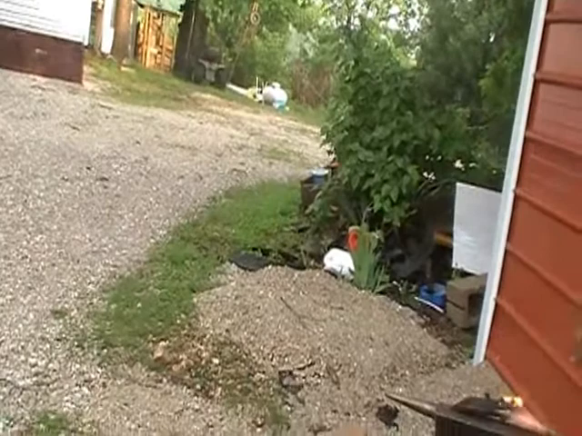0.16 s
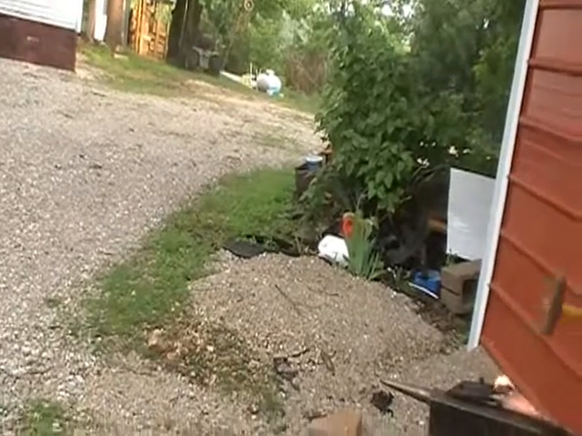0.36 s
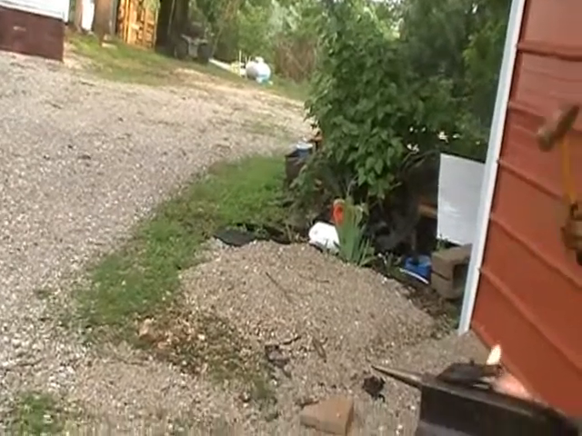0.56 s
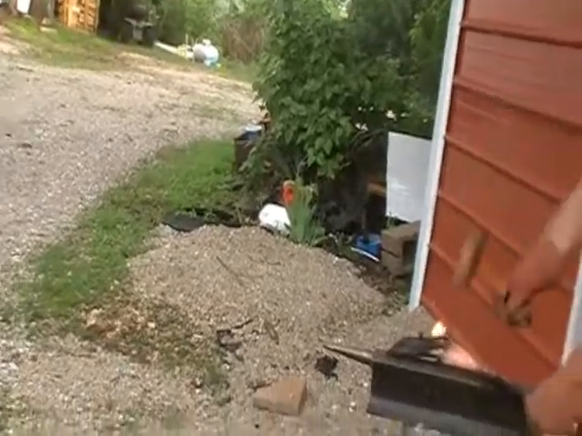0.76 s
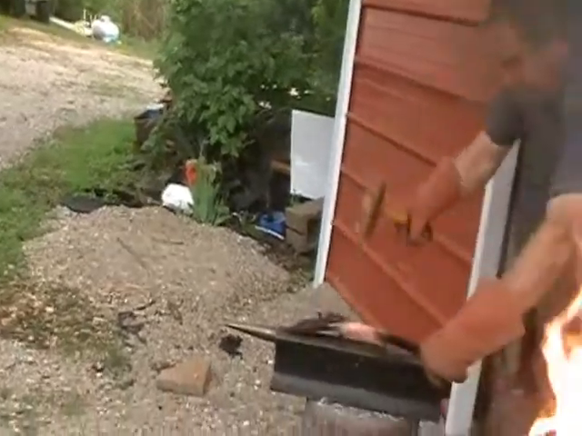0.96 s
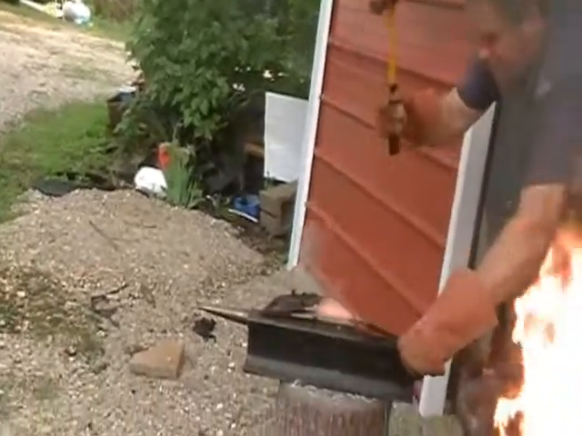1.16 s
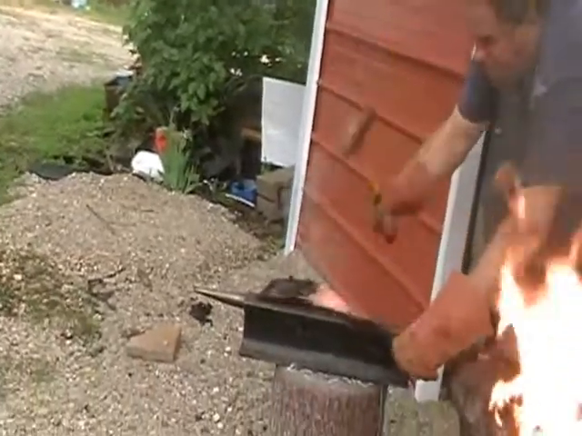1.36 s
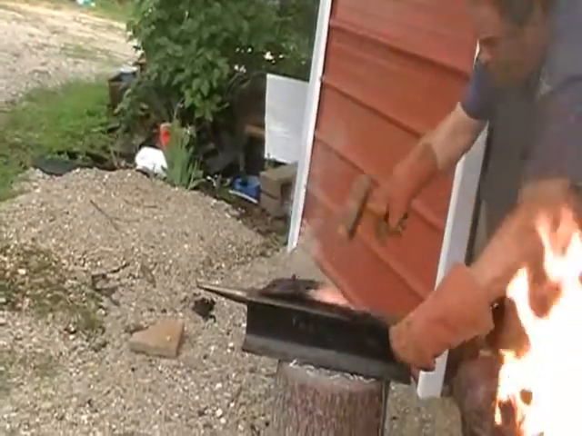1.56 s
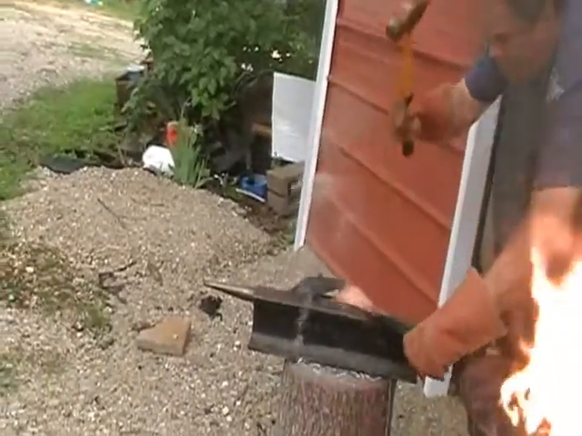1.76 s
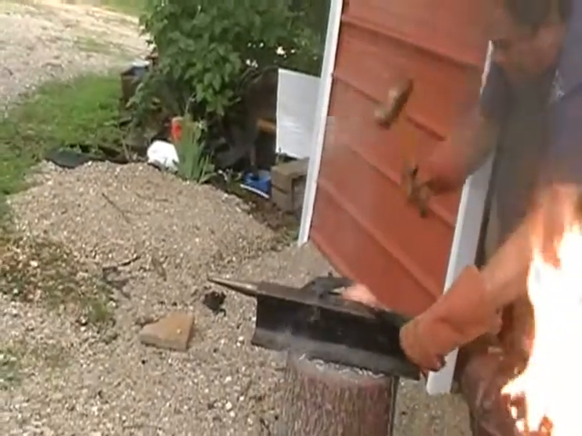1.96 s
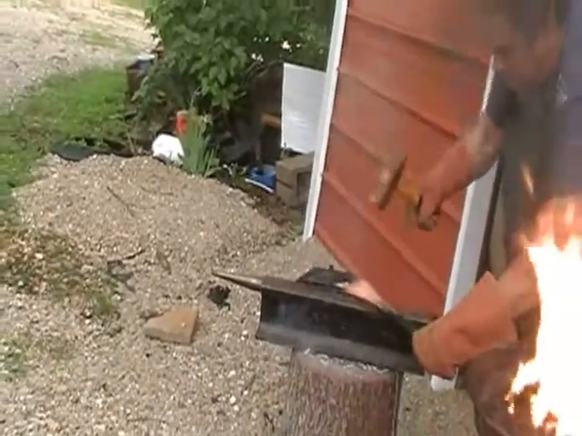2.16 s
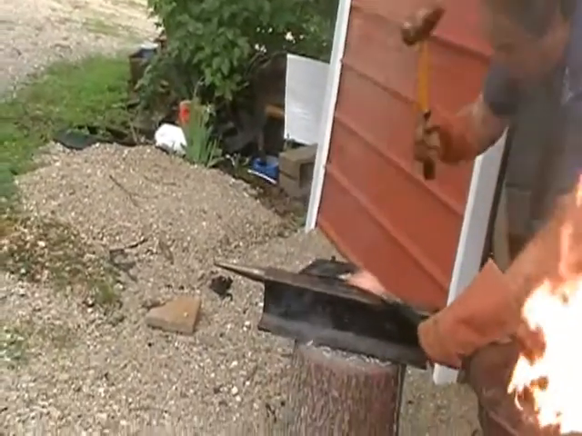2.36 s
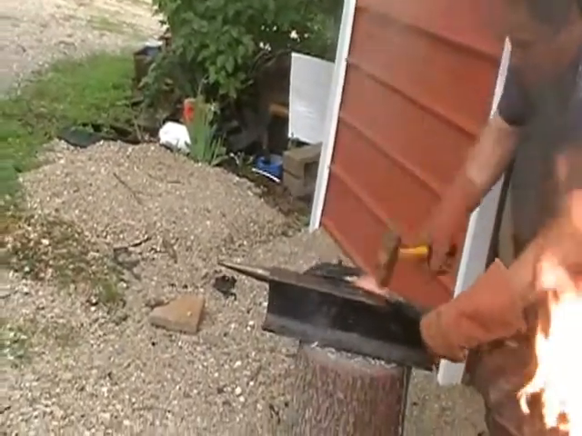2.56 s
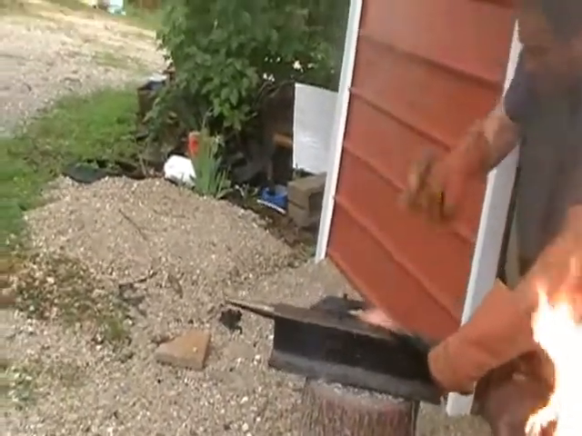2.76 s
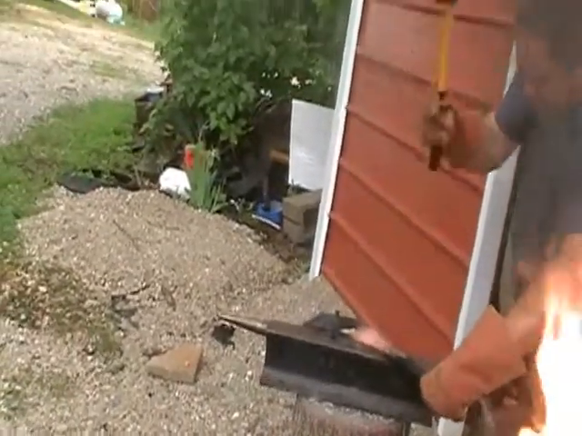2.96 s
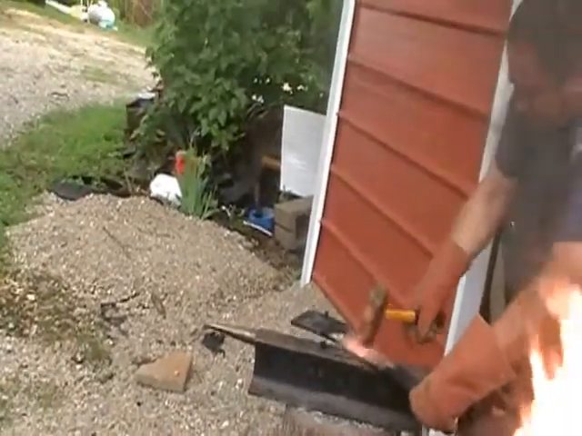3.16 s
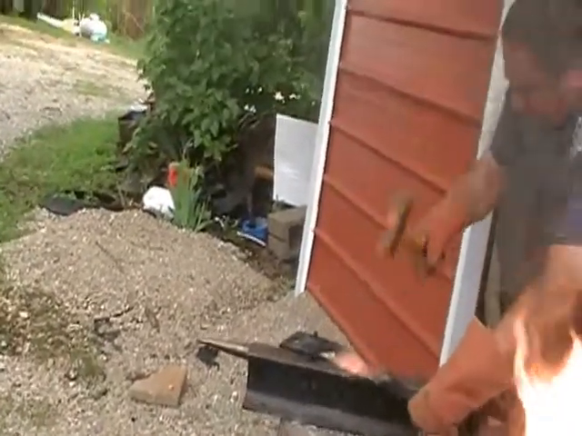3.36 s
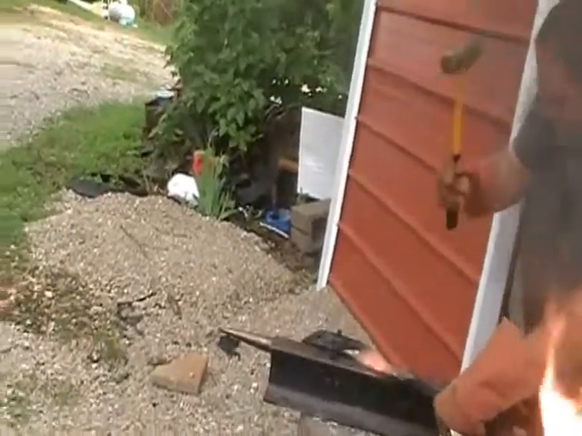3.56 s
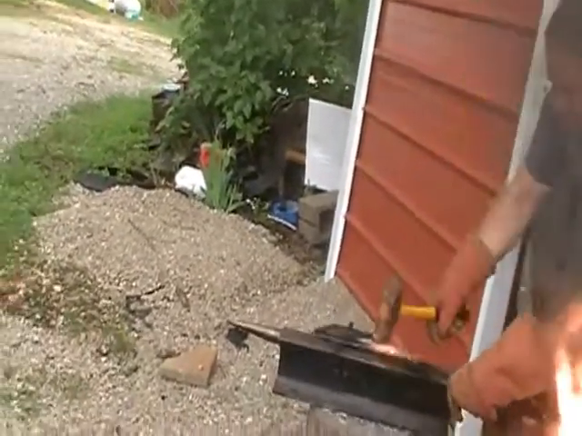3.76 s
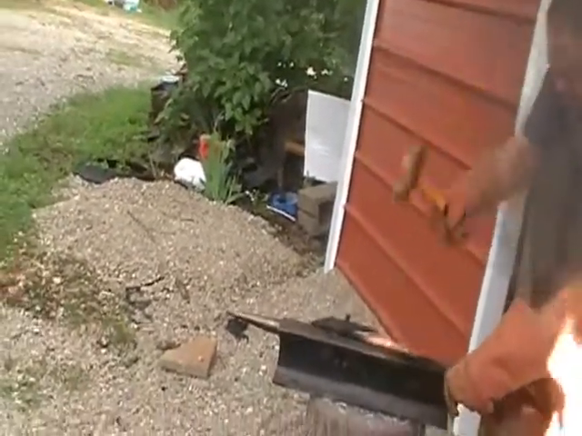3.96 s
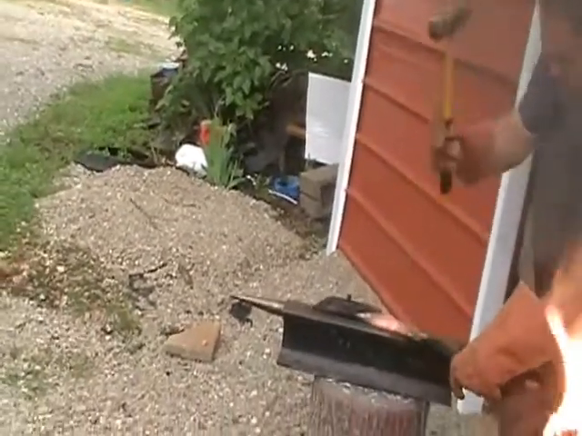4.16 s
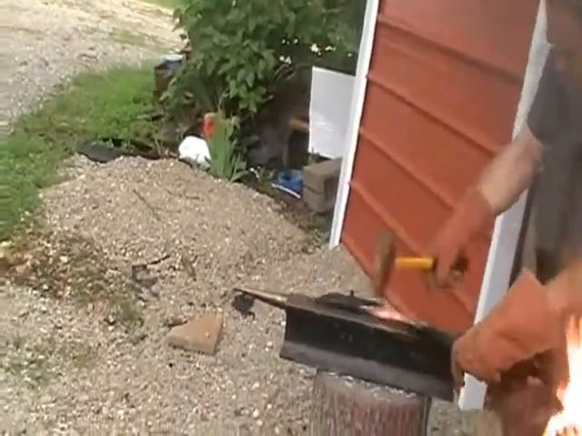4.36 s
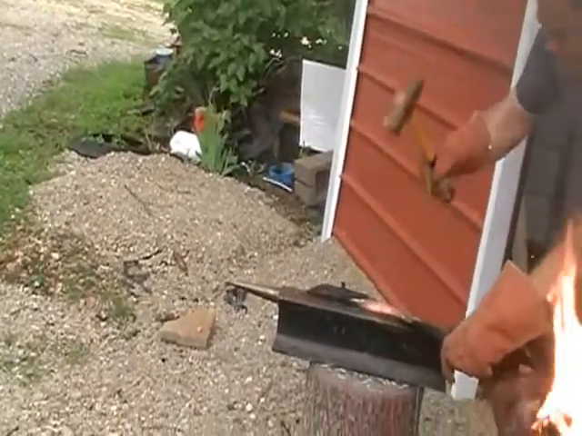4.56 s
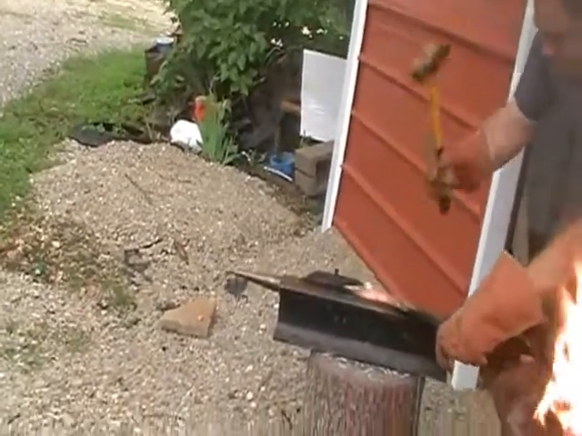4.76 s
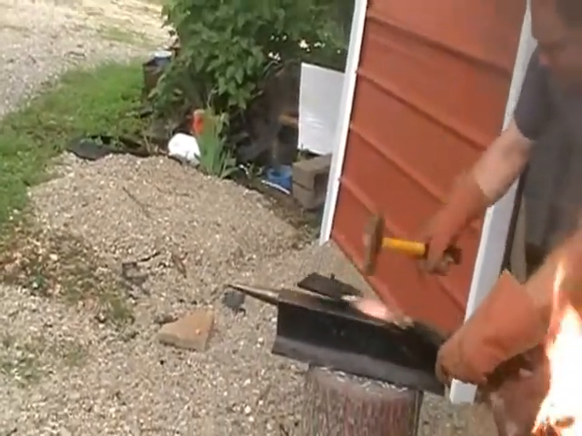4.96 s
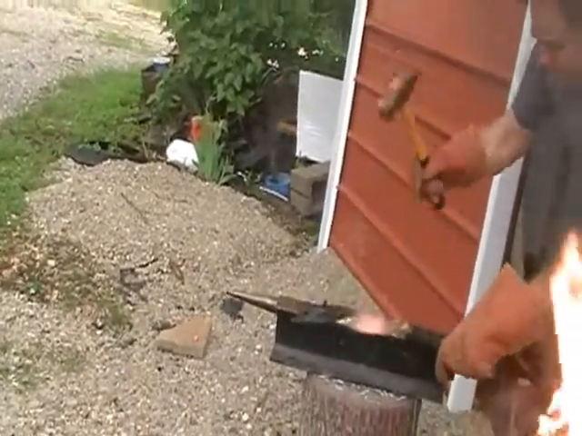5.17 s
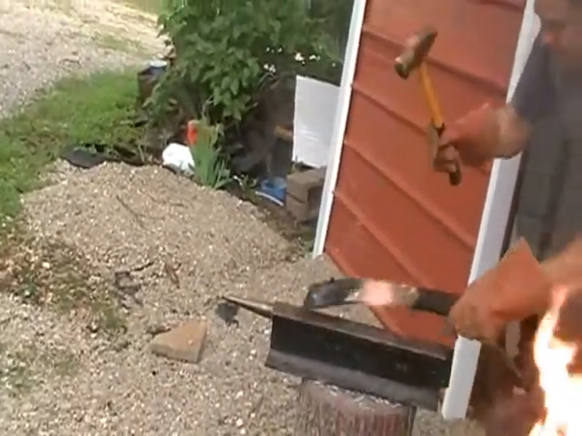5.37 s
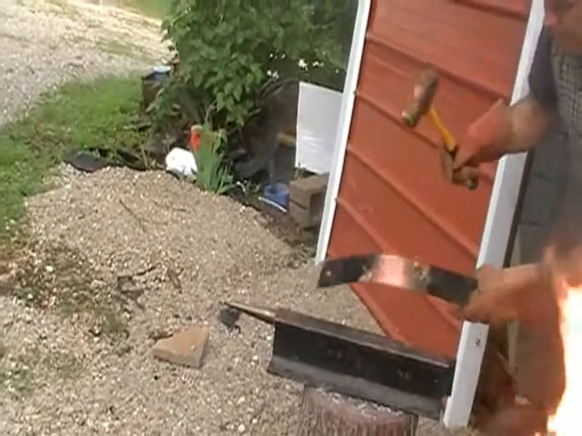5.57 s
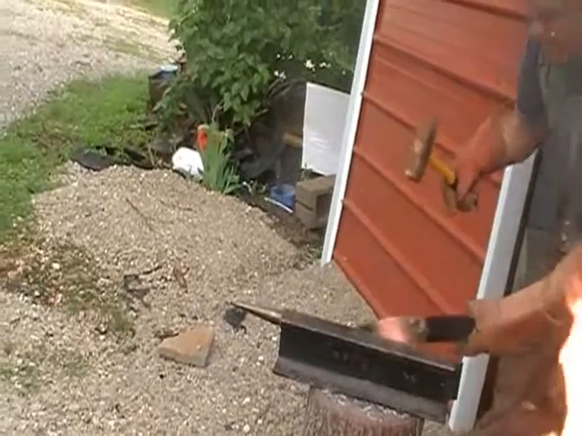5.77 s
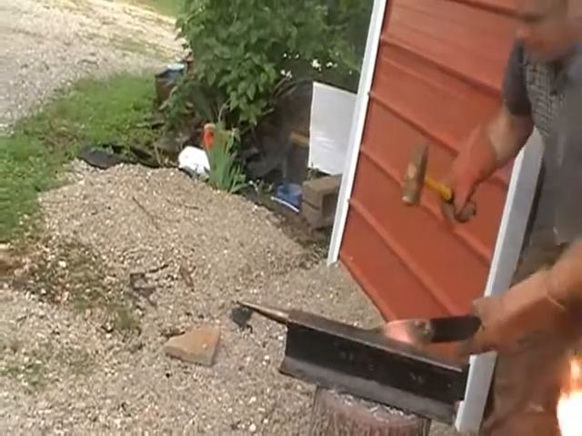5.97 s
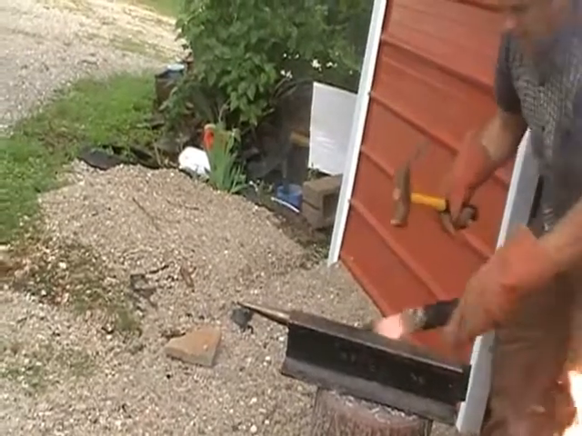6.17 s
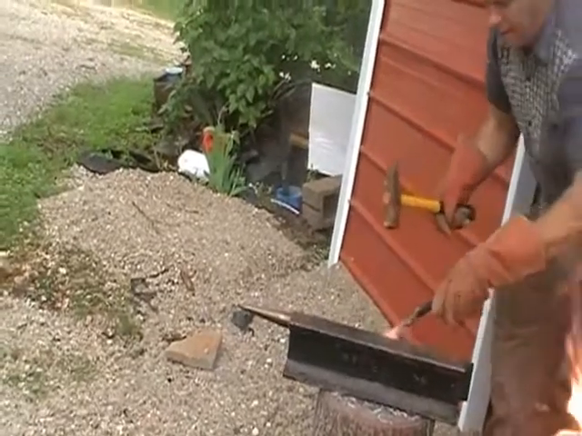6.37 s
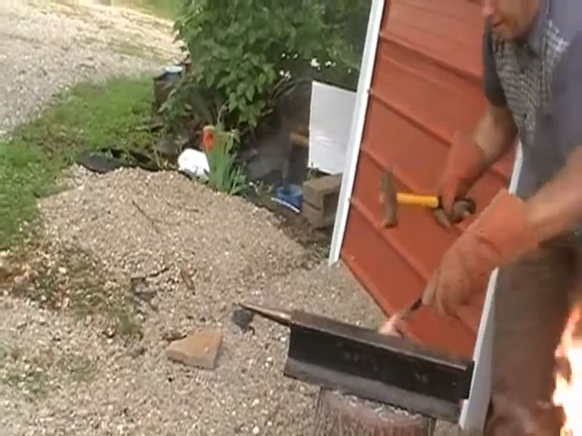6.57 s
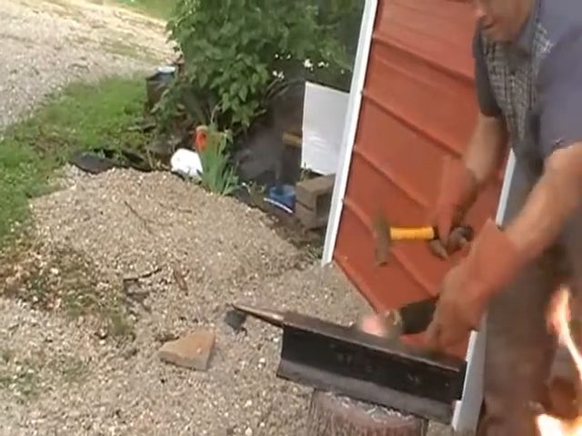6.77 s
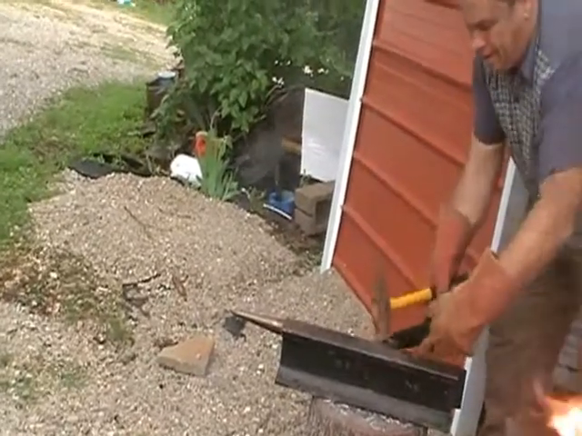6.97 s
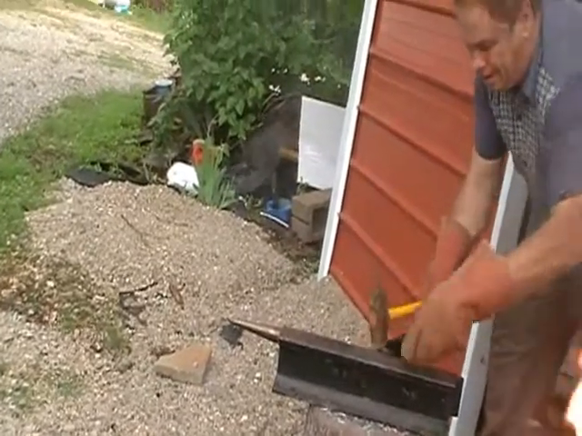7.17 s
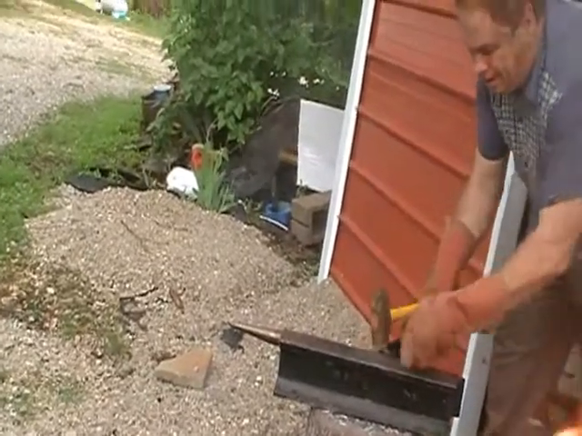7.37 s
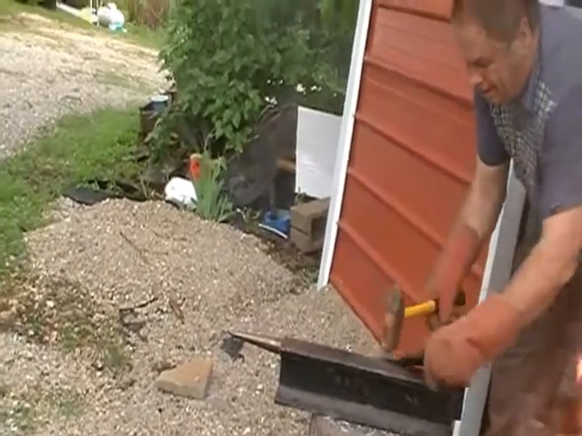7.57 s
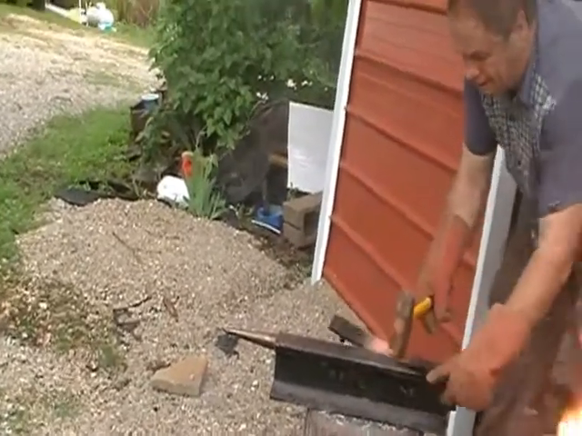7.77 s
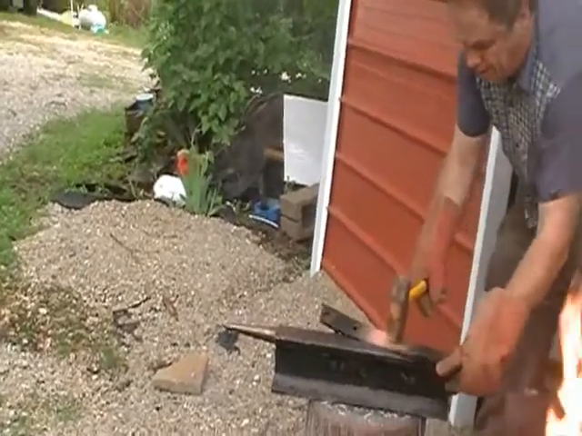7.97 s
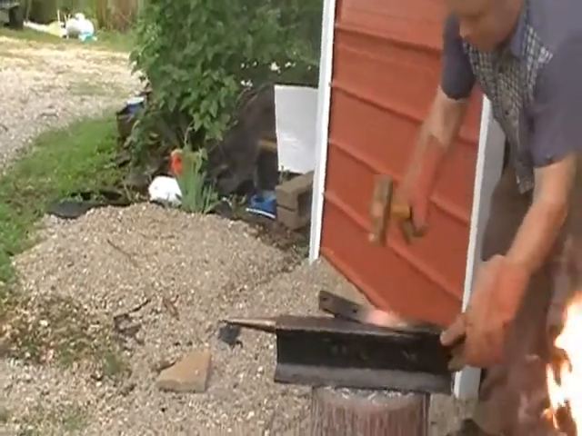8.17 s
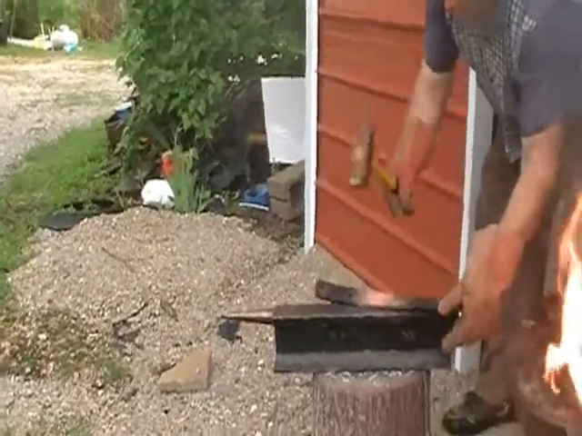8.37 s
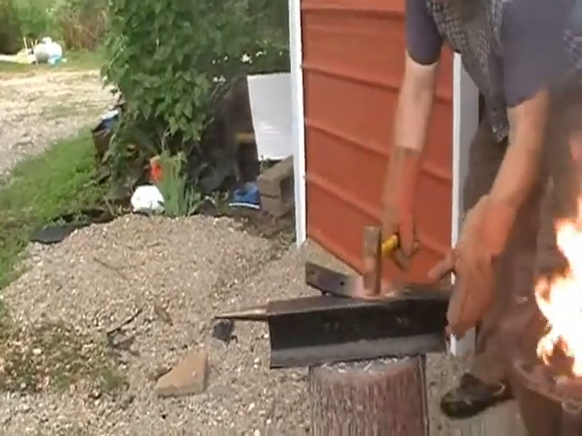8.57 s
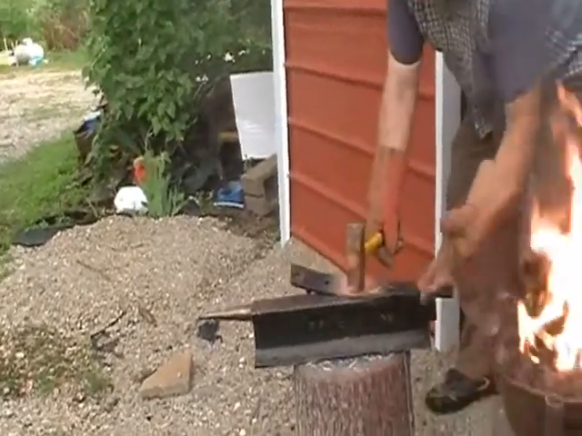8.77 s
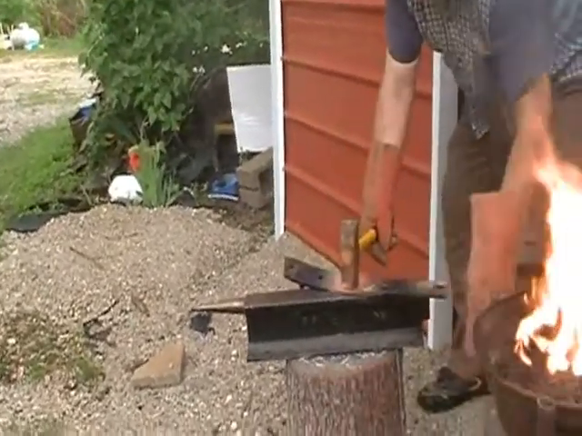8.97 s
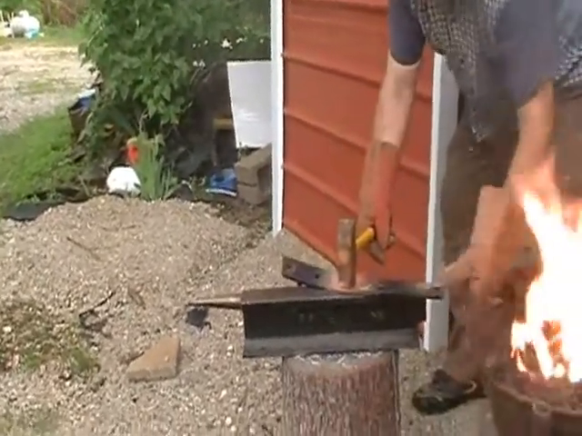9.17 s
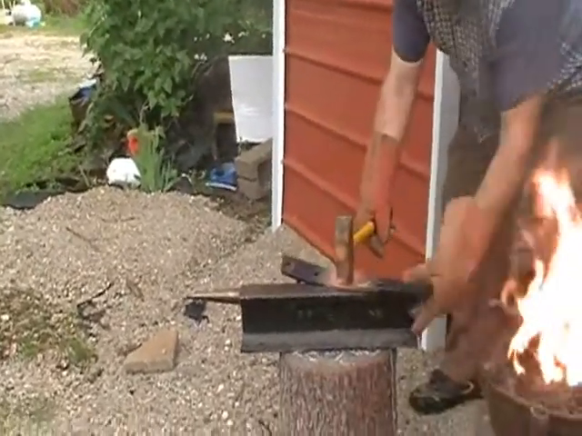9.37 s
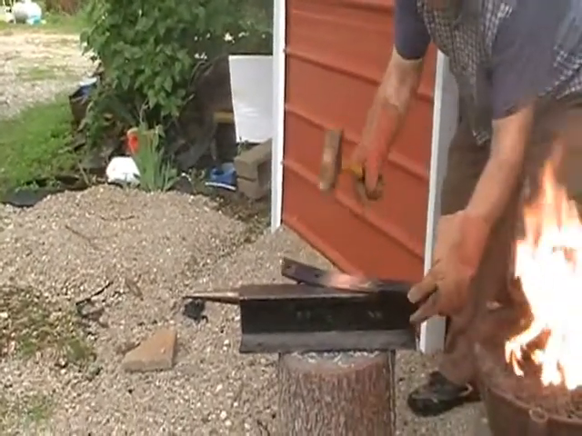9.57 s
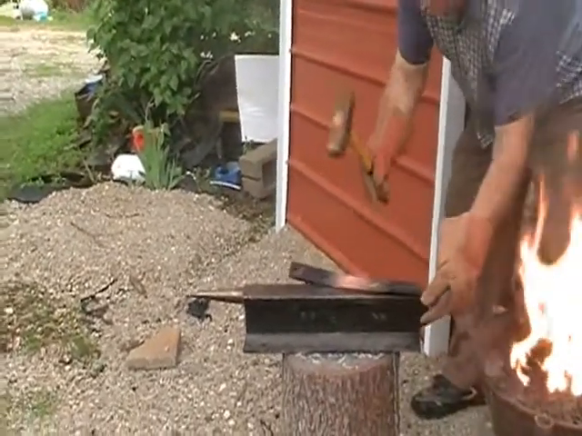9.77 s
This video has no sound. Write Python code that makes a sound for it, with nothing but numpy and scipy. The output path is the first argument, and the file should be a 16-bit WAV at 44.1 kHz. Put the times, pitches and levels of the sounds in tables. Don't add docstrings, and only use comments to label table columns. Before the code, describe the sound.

A steady, midrange roar of forced air with a faint whirring tone runs throughout. A light tap sounds at 0.2 s, then loud, clipped hammer cracks on steel at 0.85 and 1.5 s, loose and rattling, with woody knocks and a weak metallic ring. A small drop clinks at 1.8 s and a flake snaps at 2.2. A short scrape and crisp ticks lead to a firm blow at 2.6, followed by blows at 3.2, 3.8, 4.4 and 4.9 s, some with tiny bounces. Every blow makes the roar drop away and climb back steadily. The bar rings and clicks near 5.7, then mostly blower until clacks at 6.85-7.0 and gritty turning scrapes at 7.1-7.4. A dull tick comes at 7.75, a longer drag around 8.0, a final square crack at 8.5 with two quick bounces, then only the returning roar.

```python
import sys
import numpy as np
from scipy import signal
from scipy.fft import rfft, irfft
from scipy.io import wavfile
from scipy.ndimage import uniform_filter1d

SR = 44100
rng = np.random.default_rng(int(sys.argv[2]) if len(sys.argv) > 2 else 0)


def persist_wave(psi):
    counts = np.round(np.clip(psi, -1, 1) * 32767).astype(np.int16)
    wavfile.write(sys.argv[1], SR, np.atleast_2d(counts).T)


def natural_amplitude(level_db):
    exponent = np.asarray(level_db, float) / 20
    return 10 ** exponent


N = 432621
T = np.arange(N) / SR

# start_s, contact, spot, flatness_db, stump_db, ring_db, gain_dive_db
BLOWS = [
    (0.845, "loose", "face", 4, -18.5, -34.5, 25),
    (1.476, "loose", "edge", 3, -19, -33, 25.5),
    (2.6016, "firm", "middle", 8, -26, -37.5, 25),
    (3.1941, "heavy", "foot", 4, -23.5, -41, 22.5),
    (3.7788, "firm", "waist", -7, -27, -43.5, 16.5),
    (4.365, "loose", "face", -13, -25.5, -37.5, 26.5),
    (4.9167, "heavy", "tail", 0, -24, -38.5, 15),
    (8.5208, "square", "centre", -4.5, -22, -32.5, 19),
]
# start_s, contact, spot, crack_db, stump_db, ring_db, gain_dive_db
CLINKS = [(0.188, "tap", "tip", -12.5, -14.5, -37, 5), (1.8113, "drop", "step", -23, -20, -42, 1.5),
          (2.6893, "bounce", "horn", -39, -46, -53, 3.5), (3.265, "bounce", "lip", -38, -42, -52, 11.5),
          (4.457, "bounce", "horn", -44, -54, -57.5, 1), (5.005, "knock", "heel", -43, -46, -60, 2.5),
          (5.076, "drop", "step", -52, -39, -55, 2.5), (5.6986, "knock", "horn", -16, -30, -25.5, 0.5),
          (5.755, "click", "heel", -4, -17.5, -40, 9.5), (6.8505, "drop", "step", -29, -15, -48, -1),
          (6.9875, "tap", "side", -17.5, -19, -40, 3.5), (7.01, "clack", "web", -6.5, -13.5, -26, 8),
          (7.0194, "knock", "web", -25, -17.5, -28.5, 2.5), (8.0354, "slide", "side", -23, -18, -35, 0),
          (8.5828, "bounce", "step", -29, -30, -48, 7), (8.597, "bounce", "rim", -24.5, -26, -38.5, 4)]
HITS = sorted(BLOWS + CLINKS)


def level(x, db):
    return x * natural_amplitude(db) / np.sqrt(np.mean(x ** 2))


def band(x, hz, width):
    edges = [hz - width / 2, min(hz + width / 2, .45 * SR)]
    return signal.sosfilt(signal.butter(2, edges, "band", fs=SR, output="sos"), x)


def walk(rate):
    k = int(SR / rate)
    steps = np.repeat(rng.standard_normal(N // k + 1), k)
    return 1.3 * uniform_filter1d(uniform_filter1d(steps, k), k)[:N]


def ring(modes, t, scatter_db, chatter=0.):
    hz, db, t60 = np.transpose(modes)[:, :, None]
    chance = rng.standard_normal((4, len(modes), 1))
    waver = 1 + chatter * np.sin(2 * np.pi * (45 + 15 * chance[2]) * t + 2 * chance[3])
    tone = np.sin(2 * np.pi * hz * (1 + .0003 * chance[1]) * t)
    return (natural_amplitude(db + scatter_db * chance[0] - 60 * t / t60) * waver * tone).sum(axis=0)


def gain_db():
    climb_db_per_s, quick_share, quick_s, slow_s = 40, 0.31, 0.009, 0.09
    t = np.arange(0, N / SR, .001)
    age = np.maximum(t - np.array([[hit[0]] for hit in HITS]) - .003, 0)
    dive = np.maximum([[hit[-1]] for hit in HITS], 0)
    unfinished = quick_share * np.exp(-age / quick_s) + (1 - quick_share) * np.exp(-age / slow_s)
    pull = (dive * (1 - unfinished)).sum(axis=0)
    free = climb_db_per_s * t - pull
    return np.interp(T, t, free - np.maximum.accumulate(free))


def crack(t, clatter, contact, force_db, is_blow, ms, rattle_db, bar_db):
    # pitch_hz, level_db, t60_s
    bar_modes = [(855, 0, .12), (1281, -2, .15), (2497, -2, .1), (3400, -3, .12), (4300, -4, .15),
                 (4665, -4, .15), (5450, -3, .2), (7009, -5, .15), (7690, -6, .15), (9603, -2, .1),
                 (10735, -3, .12)]
    # centre_hz, width_hz
    crack_bands = [(3800, 2130), (6790, 3200), (10900, 7400), (1230, 970), (2270, 1110)]
    colour = {"loose": (-6, -4, .5, -16, -12), "firm": (-4.5, 0, -0.5, -14.5, -14),
              "heavy": (-9, -1.5, -1, -14.5, -11), "square": (0, -1, -1, -18, -8),
              "tap": (-4.5, -8, -7.5, -9.5, 1), "drop": (-3.5, -4.5, -9, 0, -2),
              "bounce": (0.5, -3, -6, -19, -8), "knock": (-1.5, 0, -1, -11, -4),
              "clack": (-4.5, -13, -12, -19, 0), "click": (-29, -9.5, -2, -26, -28),
              "slide": (-11, -5, 1, -9, -8.5)}
    flat_share = (.3, 0.091, 0, .95, .7)
    blow_db = -4.5
    extra_db = blow_db + force_db * np.array(flat_share) if is_blow else force_db
    crack_db = np.add(colour[contact], extra_db)
    burst = np.exp(-t / 0.0038 - (t / ms / 0.0008) ** 4)
    rattle = natural_amplitude(rattle_db) * (np.exp(-t / 0.01) + 0.36 * np.exp(-t / 0.1)) * clatter
    noise = rng.standard_normal((2, len(t)))
    grit = noise[0] * np.abs(noise[1]) ** 1.12 * (burst + rattle)
    grit[0] += 5
    bands = [band(band(grit, *b), *b) for b in crack_bands]
    out = sum(b / np.abs(b).max() * natural_amplitude(db + 3) for b, db in zip(bands, crack_db))
    bar_level = natural_amplitude(max(crack_db) + rattle_db + bar_db + 3)
    return out + bar_level * ring(bar_modes, t, scatter_db=3, chatter=.5)


def stump_thud(t, thud_db, thud_hz, thud_t60, thump_db):
    longest_t60_s, hold_s, tail_share = .12, .012, .3
    stump = [(thud_hz, thud_db, np.clip(thud_t60, .02, longest_t60_s)), (1.11 * thud_hz, thud_db - 7, .05)]
    rise = 1 - np.exp(-t / 0.0012)
    hold = tail_share + (1 - tail_share) * np.exp(-(t / hold_s) ** 3)
    knock = natural_amplitude(0.5) * rise * hold * ring(stump, t, scatter_db=1.5)
    return knock + band(ring([(252, thud_db + thump_db, 0.03)], t, scatter_db=2), 240, 460)


def rail_ring(t, start, wait_s, spot, ring_db, gain):
    low_hz, high_hz = (1095, 1693, 2020, 2185, 2420, 3074), (5107, 6438, 8089, 9087, 10257, 11520)
    low_t60_s, high_t60_s = (.45, .8, .17, .35, .28, .7), (.37, .24, .36, .25, .22, .26)
    blow_spots = {"face": (-21, -18, -20, -14, -14, -17, 0, -8, -13, -14, -13, -16),
                  "middle": (-16, -26, -17, -25, -14, -5, 0, -7, -10, -24, -6, -24),
                  "edge": (-24, -25, -12, -27, -9, -14, 0, -26, -1, -18, -4, -7),
                  "waist": (-21, -23, -12, -17, 0, -11, -16, -20, -16, -8, -4, -11),
                  "foot": (-26, -12, -24, -5, 4, -8, -30, -14, -15, -13, -14, -18),
                  "centre": (-15, -11, -31, -8, -9, -17, 0, -24, -13, -14, -23, -19),
                  "tail": (-21, -24, -26, -26, 0, -19, -11, -19, 1, -10, 1, -2)}
    light_spots = {"tip": (-13, -1, 3, -12, -18, -10, -2, -11, -15, -22, -9, -29),
                   "step": (-13, -7, 0, -8, 0, -10, -14, -18, -9, -22, -13, -24),
                   "horn": (-7, -11, -27, -28, -21, 0, -13, -37, -34, -33, -33, -39),
                   "heel": (1, -4, -18, -21, -5, 0, -4, -12, 0, 0, -4, -25),
                   "lip": (-22, -5, -3, -9, -13, 0, -13, -12, 1, -26, -16, -32),
                   "rim": (-5, -9, -21, -16, -9, -25, -2, -8, -4, -23, -27, -36),
                   "side": (0, -4, -14, -14, -9, -12, -24, -24, -24, -20, -18, -22),
                   "web": (-11, 0, -18, -9, -13, -11, -20, -32, -12, -32, -27, -34)}
    settle_s, ring_left = .025, .25
    t60 = np.append(low_t60_s, high_t60_s)
    spot_db = np.array({**blow_spots, **light_spots}[spot])
    struck_db = ring_db + spot_db - 1 + 60 * settle_s / t60 - gain[start + int(settle_s * SR)]
    modes = np.transpose([np.append(low_hz, high_hz), struck_db, t60])
    choke = ring_left + (1 - ring_left) * np.exp(-np.maximum(t - wait_s, 0) / 0.002)
    return ring(modes, t, scatter_db=0, chatter=.3) * choke


def hammer():
    landing = {"loose": (3, -7, -21.5, -13, 641, .12), "firm": (1.5, -19, -15, -14, 617, 0.13),
               "tap": (5.5, -12, -15, -35, 710, .09), "heavy": (3.5, -16, -20, -2.5, 614, 0.15),
               "square": (3, -19.5, -12, 1.5, 652, .06), "drop": (15, -11, -19, -36, 602, .1),
               "bounce": (4, -1, -14, -24, 642, 0.15), "knock": (7, -11, -15, -26, 615, .07),
               "clack": (2.1, -16, -14, -38, 737, .09), "click": (1.8, -13, -17, -21, 659, 0.08),
               "slide": (7, 6, -24, -11, 587, 0.1)}
    flat_thump = 1.2
    out, t, gain = np.zeros(N + SR), T[:SR // 2], gain_db()
    clatter = np.append(natural_amplitude(1.8 * walk(220)), np.ones(SR))
    starts = [hit[0] + .0005 for hit in HITS]
    for s, after, hit in zip(starts, starts[1:] + [N / SR], HITS):
        _, contact, spot, force_db, thud_db, ring_db, _ = hit
        ms, rattle_db, bar_db, thump_db, thud_hz, thud_t60 = landing[contact]
        is_blow = hit in BLOWS
        i = int(s * SR)
        x = crack(t, clatter[i:i + len(t)], contact, force_db, is_blow, ms, rattle_db, bar_db)
        x += stump_thud(t, thud_db, thud_hz, thud_t60, thump_db + flat_thump * force_db * is_blow)
        x *= natural_amplitude(-gain[i])
        out[i:i + len(t)] += x + rail_ring(t, i, after - s, spot, ring_db, gain)
    return out[:N]


def scrape():
    # start_s, length_s, level_db
    strokes = [
        (2.465, 0.085, -34.5),
        (3.61, 0.071, -57),
        (7.1, 0.12, -37),
        (7.29, 0.099, -39),
        (7.934, .28, -28.5),
    ]
    # start_s, peak_db, centre_hz
    flakes = [
        (0.2175, -20, 9600),
        (2.165, -10.5, 9800),
        (2.5057, -12, 9800),
        (2.518, -15, 9800),
        (2.5264, -21, 9800),
        (2.5506, -11, 9800),
        (5.6213, -22, 9800),
        (7.75, -13.5, 2600),
        (8.041, -12, 2600),
    ]
    grit = rng.standard_normal(N) * natural_amplitude(1.3 * walk(150))
    hiss = level(band(grit, 9660, 2500), 0) + level(band(grit, 6850, 2300), -7.5)
    out = np.zeros(N)
    for s, length, db in strokes:
        out += hiss * natural_amplitude(db) * np.sin(np.pi * np.clip((T - s) / length, 0, 1)) ** 0.67
    t = T[:SR // 50]
    for s, db, hz in flakes:
        snap = level(band(rng.standard_normal(len(t)), hz, .5 * hz), db - 7.5)
        out[int(s * SR):][:len(t)] += snap * np.exp(-t / 0.0013)
    return out * natural_amplitude(-gain_db())


def blower():
    # pitch_hz, density_db
    roar_shape = np.array([(15, -77), (25, -30.5), (208, -18.5), (296, -9), (321, -11), (444, -11.5),
                           (523, -6.5), (900, -7), (1550, -3), (2820, -18.5), (3800, -17.5), (6900, -20),
                           (10700, -14.5), (15200, -27.5), (16400, -39)])
    # centre_hz, width_hz, level_db
    duct = [(392, 35, -49.5), (524.3, 16.4, -45.5), (601, 24, -51), (726, 62, -42.5), (826.6, 16, -48),
            (1232, 21.5, -46.5), (1566, 63, -38), (1731, 127, -38.5), (1995, 180, -42), (3736, 320, -46)]
    # multiple (of blade_hz), level_db
    blade_tones = [(1, -46), (8, -56.5), (9, -54.5), (10, -55.5), (19, -58), (26, -58.5), (27, -64),
                   (28, -52.5)]
    roar_db, blade_hz = -28, 329.3
    hz = np.fft.rfftfreq(N, 1 / SR)
    colour_db = np.interp(np.log(hz + 1), np.log(roar_shape[:, 0]), roar_shape[:, 1])
    air = irfft(rfft(rng.standard_normal(N)) * natural_amplitude(colour_db), N)
    out = level(air * natural_amplitude(0.36 * walk(14)), roar_db - 2)
    for centre, width, db in duct:
        out += level(band(rng.standard_normal(N), centre, width) * natural_amplitude(2.07 * walk(15)), db)
    turn = 2 * np.pi * np.cumsum(blade_hz * (1 + .0008 * walk(3))) / SR
    for multiple, db in blade_tones:
        out += natural_amplitude(db + 4.5 + 1.1 * walk(12)) * np.sin(int(multiple) * turn)
    return out


def scene():
    return np.tile(hammer() + scrape() + blower(), (2, 1))


def roll_off(x):
    return signal.sosfilt(signal.butter(12, 16600, fs=SR, output="sos"), x)


def record(dry):
    rumble_db, top_hz = -80.5, 15800
    gain = gain_db()
    treble = signal.sosfilt(signal.butter(1, 6000, "high", fs=SR, output="sos"), dry)
    x = (dry - (1 - natural_amplitude(0.044 * gain)) * treble) * natural_amplitude(gain)
    x = x / (1 + (x / 1.02) ** 4) ** 0.23
    x = signal.sosfilt(signal.butter(1, 50, "high", fs=SR, output="sos"), x)
    x = x + level(band(rng.standard_normal(N), 70, 100), rumble_db)
    x = signal.sosfilt(signal.ellip(8, .2, 25, top_hz, fs=SR, output="sos"), x)
    return roll_off(x)


dry = scene()
out = record(dry)
persist_wave(out)
```